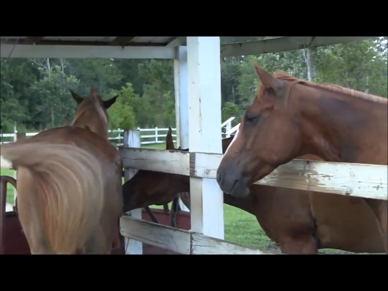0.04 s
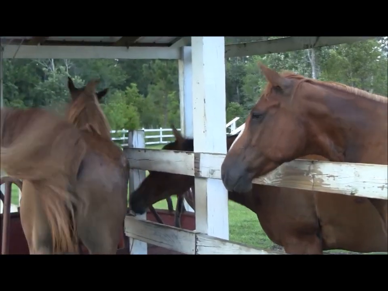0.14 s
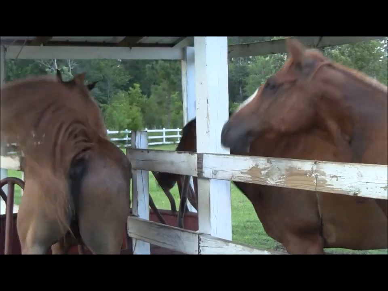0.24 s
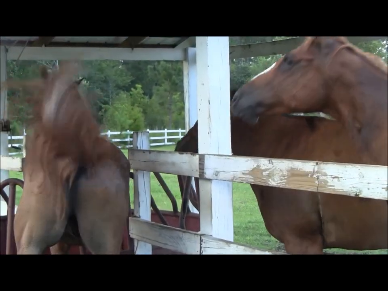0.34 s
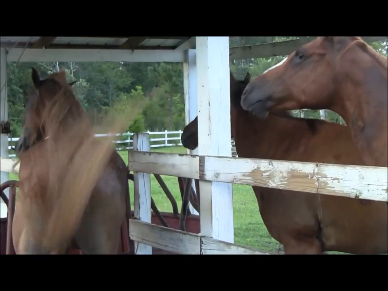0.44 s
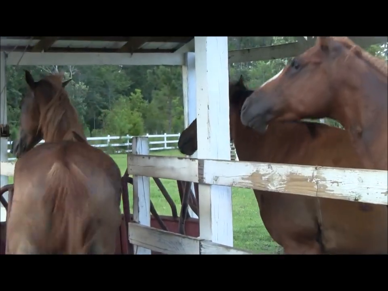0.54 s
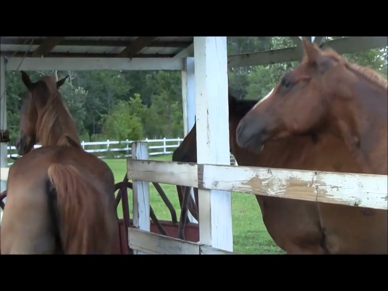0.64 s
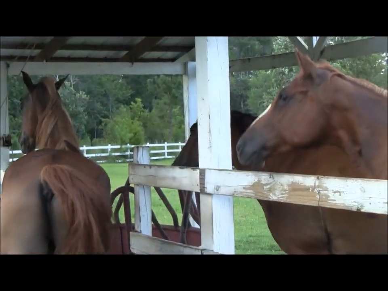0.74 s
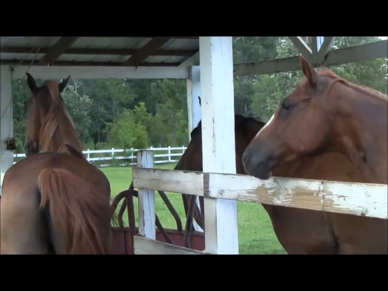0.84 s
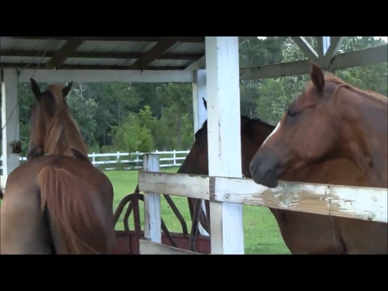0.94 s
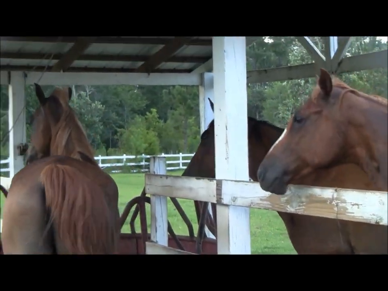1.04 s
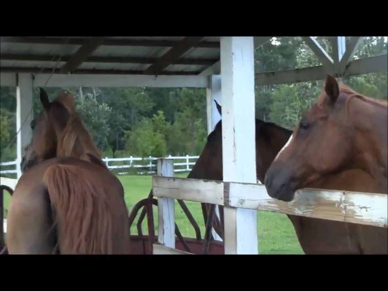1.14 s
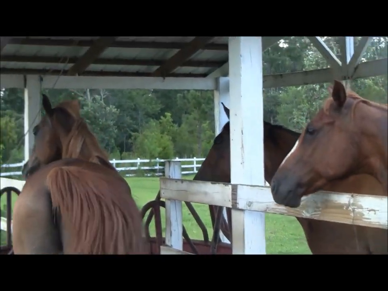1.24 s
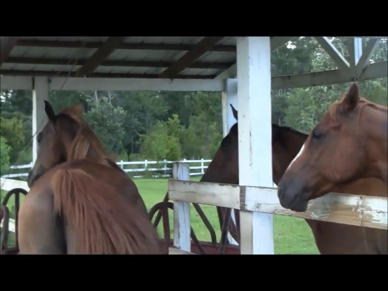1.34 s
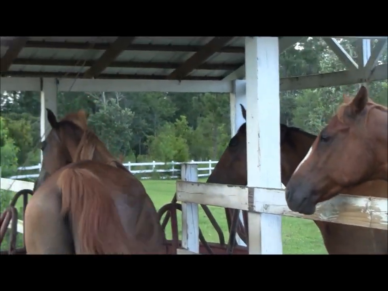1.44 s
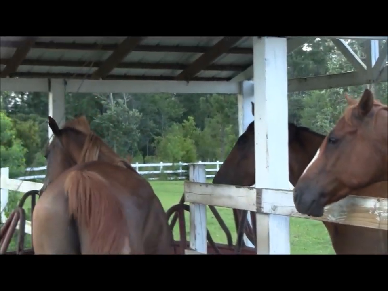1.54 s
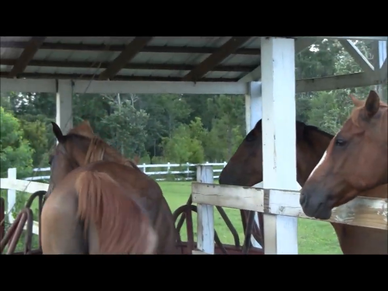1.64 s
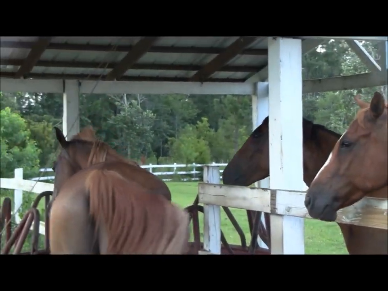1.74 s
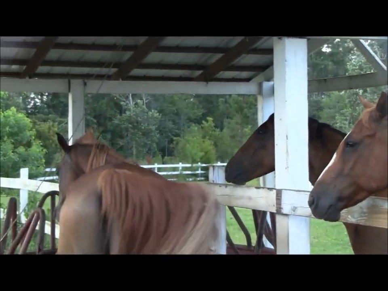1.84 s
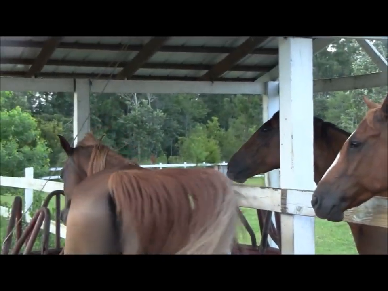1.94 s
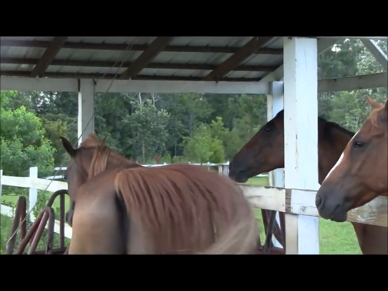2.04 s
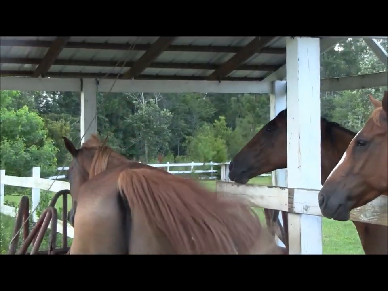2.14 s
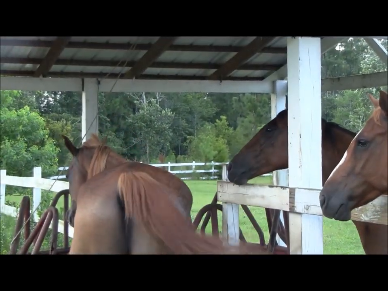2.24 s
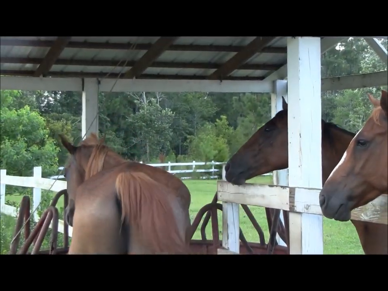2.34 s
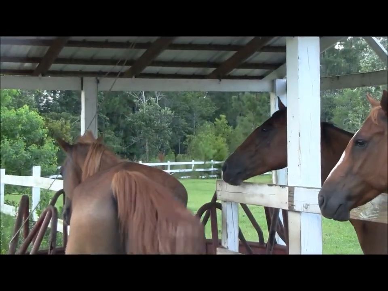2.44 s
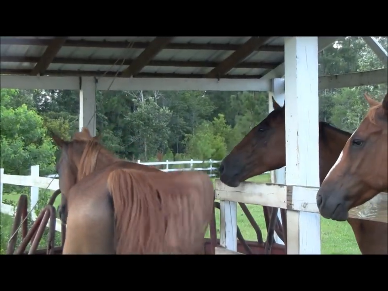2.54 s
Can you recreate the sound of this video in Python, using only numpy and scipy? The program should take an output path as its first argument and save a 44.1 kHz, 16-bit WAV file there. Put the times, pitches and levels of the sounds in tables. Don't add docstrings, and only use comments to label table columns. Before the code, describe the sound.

One brief horse squeal breaks from a snort near the start, roughens into a growl and fades in whimpers; afterwards crickets and katydids, faint traffic, soft tail swishes and a rail tick, heard outdoors with automatic gain.

```python
import sys
import numpy as np
from scipy import signal
from scipy.io import wavfile
from scipy.ndimage import uniform_filter1d

SR = 44100
rng = np.random.default_rng(int(sys.argv[2]) if len(sys.argv) > 2 else 0)


def persist_wave(psi):
    counts = np.round(np.clip(psi, -1, 1) * 32767).astype(np.int16)
    wavfile.write(sys.argv[1], SR, np.atleast_2d(counts).T)


def how_loud(loudness_db):
    steps = np.asarray(loudness_db, float) / 20
    return 10 ** steps


N = 114660
T = np.arange(N) / SR
JITTER = 0.0044

# pitch_hz, width_hz, level_db
THROAT_SHAPE = [(366, 23, -16.5), (440, 35, -14.5), (547, 146, -5), (745, 102, -8.5), (1000, 244, 0.5),
                (1571, 156, -2), (1778, 98, -5.5), (1992, 17, -11.5), (2468, 100, -17.5), (3550, 430, -24),
                (2720, 120, -36.5), (4236, 180, -26.5), (6100, 500, -38)]


def evened(x):
    return x / np.sqrt(np.mean(x ** 2) + 1e-20)


def read(points, hz):
    f, value = np.transpose(points)
    return np.interp(np.log(hz + 1), np.log(f + 1), value)


def columns(rows):
    s, *values = np.transpose(rows)
    gate = np.clip(np.minimum(T - s[0], s[-1] - T) / 0.0015, 0, 1)
    return [gate] + [np.interp(T, s, value) for value in values]


def wobble(size):
    smooth = uniform_filter1d(rng.standard_normal(N), size=size)
    return evened(uniform_filter1d(smooth, size=size // 2))


def turning(hz):
    return 2 * np.pi * np.cumsum(hz) / SR


def resonate(x, hz, width):
    turn = np.exp(1j * turning(hz * np.ones(N)))
    r = np.exp(-np.pi * width / SR)
    return 2 * (turn * signal.lfilter([1 - r], [1, -r], x / turn)).real


def humming_noise(hz, width):
    return evened(resonate(rng.standard_normal(N), hz, width))


def hiss(spectrum):
    a, b, patches = rng.standard_normal((N // 256 + 5, 513, 3)).T
    patches = uniform_filter1d(patches, size=10, axis=0)
    patches = evened(uniform_filter1d(patches, size=12, axis=1))
    colour_db = read(spectrum, np.fft.rfftfreq(1024, 1 / SR))[:, None]
    z = (a + 1j * b) * how_loud(colour_db + 1.5 * patches)
    return evened(signal.istft(z, nperseg=1024, noverlap=768)[1][:N])


def traffic():
    # pitch_hz, level_db
    rumble = [
        [(12, -71.5), (20, -36), (32, -53.5), (52, -88), (135, 4.5), (202, -0.5), (381, -9.5), (1210, 0), (2000, -10.5), (2600, -53), (4400, -120)],
        [(12, -66), (20, -33), (65, -42), (206, -10.5), (374, -5), (2000, -18), (2600, -52), (4400, -120)],
    ]
    # pitch_hz, width_hz, level_db
    drones = [(122, 7.3, -90), (128, 3.8, -62), (210.4, 9.3, -62)]
    road = np.array([how_loud(db) * hiss(spectrum) for spectrum, db in zip(rumble, (-48.5, -54))])
    for hz, width, db in drones:
        road[0] += how_loud(db) * humming_noise(hz, width)
    return road * how_loud(0.5 * (T - 2.5))


def distant_insects():
    # pitch_hz, level_db
    swarm = [(1500, -14.5), (2100, 0), (3500, -10), (6400, -17), (7100, -0.5), (10500, -12), (11300, -18),
             (15500, -26.5)]
    return np.array([how_loud(db) * hiss(swarm) for db in (-58, -62.5)])


def near_crickets():
    # start_s, strokes so far, shift of even strokes (share of a stroke; plus is later)
    strokes = [(0.03, 1.34, -0.22), (0.189, 9.78, -0.14), (0.348, 17.95, -0.07), (0.506, 26.25, -0.02),
               (0.665, 34.45, 0.11), (0.824, 42.91, 0.1), (0.982, 51.11, -0.18), (1.141, 59.37, -0.15),
               (1.3, 67.57, -0.02), (1.459, 75.41, -0.09), (1.618, 83.61, 0.02), (1.776, 91.78, 0.1),
               (1.935, 99.88, 0.04), (2.094, 107.77, 0.07), (2.252, 115.92, 0.14), (2.411, 123.96, 0.08),
               (2.57, 132.27, 0.09)]
    pitch_hz, fall_hz, stroke_s = 8213, 850, .011
    s, count, shift = np.transpose(strokes)
    k = np.arange(int(count[-1]) + 2)
    at = np.interp(k, count, s, left=-1)
    at = at + (-1.) ** k * np.interp(at, s, shift) / 59.0 - stroke_s / 2
    u = np.arange(0, stroke_s, 1 / SR)
    swell = np.sin(np.pi * (u / stroke_s) ** 0.79) ** 2
    out = np.zeros(N + 2000)
    for start, (a, b, c) in zip(at, rng.standard_normal((len(k), 3))):
        if start > 0:
            phase = turning(pitch_hz + 60 * a - fall_hz * u / stroke_s) + 3 * c
            out[round(start * SR):][:len(u)] += how_loud(0.5 * b) * swell * np.sin(phase)
    near = how_loud(-60) * evened(out[:N] * (1 + 0.1 * wobble(size=30)))
    return np.array([near, how_loud(-15.5) * np.roll(near, 2)])


def katydids():
    # pitch_hz, width_hz, centre_db, side_db
    buzz = [(9140, 210, -69, -68), (9670, 150, -66.5, -60), (10050, 200, -69.5, -86)]
    throb = 1 + 0.17 * np.sin(turning(88 + 1.2 * wobble(size=4000)))
    out = np.zeros((2, N))
    for hz, width, *levels in buzz:
        for ch, db in enumerate(levels):
            narrow = resonate(resonate(rng.standard_normal(N), hz, width), hz, width)
            out[ch] += how_loud(db) * throb * evened(narrow)
    return out


def far_cricket():
    throb = 1 + 0.49 * np.sin(2 * np.pi * 26.5 * T)
    return how_loud(-76.5) * throb * humming_noise(4619, 119)


def pasture():
    out = traffic() + distant_insects() + near_crickets() + katydids()
    out[0] += far_cricket()
    return out


def gain_control():
    # start_s, level_db
    gain = [
        (0, 4.5),
        (.195, 8),
        (.205, -1.5),
        (.4, -9),
        (.58, -4.5),
        (.78, -1),
        (1.4, 0.5),
        (2.6, 1.5),
    ]
    return how_loud(columns(gain)[1])


def tails():
    # centre_s, width_s, level_db, tilt (db per octave; plus is brighter)
    swishes = [
        (0.587, 0.036, -52, 5.5),
        (0.678, 0.036, -51, 3.5),
        (1.397, 0.023, -50.5, -3.5),
        (1.52, .025, -54, 5.5),
        (1.925, 0.019, -55, 3),
        (1.985, 0.044, -61, 1.5),
        (2.5, 0.015, -58, 9),
    ]
    # pitch_hz, level_db
    hair = [(150, -65), (500, -6), (2000, 0), (10000, -10), (16000, -8.5)]
    out = np.zeros((2, N))
    for s, width, db, tilt_db in swishes:
        colour = [(f, d + tilt_db * np.log2(f / 8000)) for f, d in hair]
        swell = np.exp(-.5 * ((T - s) / width) ** 2)
        grain = how_loud(db + 1.9 * wobble(size=150))
        out += grain * swell * np.array([hiss(colour), .6 * hiss(colour)])
    return out


def rail_ticks():
    # start_s, peak_db, pitch_hz
    ticks = [
        (.682, -49, 7230),
        (1.911, -36.5, 2440),
        (1.912, -47.5, 4300),
    ]
    out = np.zeros(N)
    for s, db, hz in ticks:
        burst = (T > s) * np.exp(-abs(T - s) / 0.0029) * rng.standard_normal(N)
        out += how_loud(db) * (.08 * burst + 3.0 * resonate(burst, hz, 700))
    return out


def snort():
    # pitch_hz, db_per_hz
    nostrils = [(35, -52.5), (60, -23.5), (1420, -10), (2840, -12), (5450, -29), (7900, -32),
                (15500, -39.5)]
    # start_s, level_db
    blow = [(.1, -61), (.124, -45.5), (.132, -32.5), (.15, -30.5), (.198, -38.5), (.204, -41), (.3, -41),
            (.48, -44), (.58, -68)]
    gate, db = columns(blow)
    return gate * how_loud(db + 0.37 * wobble(size=200)) * hiss(nostrils)


def tone(rows, upper_db=()):
    gate, hz, *levels = columns(rows)
    phase = turning(hz * (1 + JITTER * wobble(size=150)))
    levels += [levels[-1] + db + 0.86 * wobble(size=600) for db in upper_db]
    stack = sum(how_loud(db) * np.sin((k + 1) * phase + k) for k, db in enumerate(levels))
    return np.sqrt(2) * gate * stack


def yelp_and_whistle():
    # start_s, pitch_hz, level_db of 1st, 2nd, 3rd, .. partial
    yelp = [(.158, 691, -35, -41, -70), (.18, 649.4, -29.5, -28.5, -42.5), (.197, 644, -25, -15, -29),
            (.202, 657, -46, -32.5, -31.5), (.212, 651, -19, -30, -50)]
    whistle = [(0.208, 668.4, -42.5, -35, -36, -70.5), (0.222, 674.4, -11.5, -31, -37.5, -59.5),
               (0.244, 666, -18.5, -33.5, -25, -66), (0.272, 619.4, -17, -26, -45.5, -48),
               (0.286, 625, -16.5, -27, -28, -42), (0.298, 621, -14.5, -28, -41, -43),
               (0.306, 608.7, -18, -29, -43, -39), (0.322, 602, -13, -31.5, -24, -38),
               (0.338, 600, -24.5, -36, -31, -42)]
    yelp_upper = [-5, -24, -14.5, -22.5, -45]
    whistle_upper = [-5, -26, -15.5, -17, -41, -28.5]
    return tone(yelp, yelp_upper) + tone(whistle, whistle_upper)


def undertone():
    # start_s, pitch_hz, level_db
    vibration = [(.215, 342.6, -33.5), (.238, 352.3, -21.5), (.265, 330.3, -26.5), (.29, 307, -35.5)]
    # multiple of the pitch, level_db
    multiples = [(3, 0), (4, -3.5), (5, -3.5), (6, -20), (7, -27.5)]
    gate, hz, level_db = columns(vibration)
    phase = turning(hz * (1 + JITTER * wobble(size=150)))
    out = np.zeros(N)
    for m, db in multiples:
        out += how_loud(level_db + db + 3 * wobble(size=300)) * np.sin(m * phase + 1.1 * wobble(size=500))
    return gate * out


def whimpers():
    # start_s, pitch_hz, level_db of 1st and 2nd partial
    calls = [
        [(.59, 565, -46, -60), (.608, 568, -35, -29.5), (.63, 541.5, -51, -32.5), (.648, 543, -40.5, -50)],
        [(.722, 562.5, -56, -46), (.736, 558, -38, -39), (.757, 520, -62, -59)],
    ]
    return sum(tone(call) for call in calls)


def throat_rings():
    # start_s, pitch_hz, level_db
    rings = [
        [(.47, 1000, -37), (.495, 999, -33.5), (.52, 1000, -38), (.538, 993, -51), (.548, 993, -63),
         (.565, 942, -49), (.58, 925, -39), (.592, 1012, -42), (.61, 1026, -33.5)],
        [(.25, 3090, -61.5), (.265, 3090, -51.5), (.285, 2895, -55), (.305, 3000, -46)],
        [(.235, 2380, -49.5), (.26, 2290, -39), (.285, 2380, -50.5), (.3, 2370, -43)],
        [(.722, 3980, -73), (.74, 3880, -64), (.775, 3810, -70.5)],
        [(.603, 1520, -46), (.61, 1491, -29), (.635, 1443, -31), (.65, 1452, -40.5), (.672, 1460, -48)],
    ]
    return sum(tone(ring) * how_loud(2.5 * wobble(size=300)) for ring in rings)


def throat(drive, mouth, shape):
    band = signal.butter(4, [340, 6500], "band", fs=SR, output="sos")
    drive = signal.sosfilt(band, drive)
    out = np.zeros(N)
    for k, (hz, width, db) in enumerate(shape):
        ring = resonate(resonate(drive, hz * mouth, 1.02 * width), hz * mouth, 1.33 * width)
        out += (-1) ** k * how_loud(db) * np.sqrt(1000 / width) * ring
    return evened(out)


def breath(loud, weak):
    # pitch_hz, width_hz, level_db
    whimper_shape = [(370, 60, -14), (1100, 160, -2), (1510, 140, -15), (1760, 110, -6), (1965, 110, 1),
                     (2450, 35, -10), (2600, 45, -5), (3580, 320, -15), (4580, 370, -19.5)]
    effort, weak_effort = np.sqrt(abs(uniform_filter1d(np.array([loud, weak]) ** 2, size=400)))
    air = np.diff(rng.standard_normal((2, N + 1)))
    squeal_air = how_loud(-21) * effort * throat(air[0], 0.92, THROAT_SHAPE)
    whimper_air = how_loud(-12.5) * weak_effort * throat(air[1], 0.96, whimper_shape)
    return squeal_air + whimper_air


def singing_ridges(turns):
    # start_s, pitch_hz, level_db
    ridge_tables = [
        [(0.33, 577.4, -25.5), (0.34, 575.6, -38.5), (0.418, 511, -28.5), (0.438, 572.5, -37.5),
         (0.446, 556, -61), (0.462, 560, -39)],
        [(0.326, 1031, -24), (0.332, 992, -16), (0.34, 1003, -15.5), (0.374, 993, -19.5), (0.382, 959.7, -17.5),
         (0.42, 943.4, -19), (0.434, 1014, -24), (0.446, 1019, -19.5), (0.462, 1013, -32)],
        [(0.328, 1640, -33), (0.332, 1619, -33.5), (0.408, 1496, -24), (0.424, 1497, -30), (0.44, 1492, -18),
         (0.454, 1527, -25.5), (0.462, 1592, -30), (0.47, 1600, -38)],
        [(0.33, 1748, -28), (0.366, 1687, -26), (0.376, 1713, -39), (0.398, 1690, -23.5), (0.418, 1797, -32),
         (0.444, 1737, -35), (0.47, 1750, -45)],
    ]
    ridges = np.zeros(N)
    for k, rows in enumerate(ridge_tables):
        gate, hz, db = columns(rows)
        throb = 1 + .4 * np.cos(2 * np.pi * turns - 2 + 1.3 * k)
        phase = turning(hz) + .2 * wobble(size=250)
        ridges += 1.2 * gate * how_loud(db) * throb * np.sin(phase)
    strain = how_loud(-8) * ridges ** 2 + how_loud(-14) * ridges ** 3
    highpass = signal.butter(6, 1920, "high", fs=SR, output="sos")
    return ridges + signal.sosfilt(highpass, strain)


def growl():
    # start_s, mouth_hz (main resonance), level_db, pulses per s
    course = [(.326, 1011, -33, 140), (.34, 1000, -30, 118), (.37, 1000, -34, 108), (.41, 967, -30.5, 80),
              (.432, 1000, -32.5, 88), (.457, 1019, -35, 90), (.475, 1000, -37, 53), (.51, 1000, -47, 46),
              (.6, 974, -59, 170)]
    rough, folds_stop_s, fade_s = .55, .462, .012
    gate, mouth_hz, db, rate = columns(course)
    voiced = np.clip((folds_stop_s - T) / fade_s, 0, 1)
    turns = np.cumsum(rate * (1 + .05 * wobble(size=500))) / SR
    pulses = np.diff(np.floor(turns), prepend=0) * voiced * gate
    puffs = (.5 + np.exp(-(turns % 1) / 0.39)) * rng.standard_normal(N) * gate
    drive = (1 - rough) * evened(pulses) + rough * evened(puffs)
    return gate * how_loud(db) * throat(drive, mouth_hz / 1000, THROAT_SHAPE) + singing_ridges(turns)


def horse():
    loud = yelp_and_whistle() + undertone()
    weak = whimpers()
    return snort() + loud + weak + throat_rings() + breath(loud, weak) + growl()


def shelter(voice):
    t60_s, side_db = 0.87, -15.5
    t = np.arange(SR // 2) / SR
    taps = rng.choice([-1., 1.], (2, len(t))) * (rng.random((2, len(t))) < .05)
    taps = taps * how_loud(-60 * t / t60_s) * (t > .004)
    taps = taps[0] + how_loud(side_db) * np.array([taps[1], -taps[1]])
    taps = taps / np.linalg.norm(taps[0])
    return how_loud(-18) * signal.fftconvolve(voice[None], taps, axes=1)[:, :N]


def scene():
    mid, side = pasture() * gain_control() + tails()
    mid = mid + rail_ticks()
    voice = horse()
    direct = voice * how_loud(np.array([[0.54], [-0.54]]))
    return direct + shelter(voice) + np.array([mid + side, mid - side])


def band_limit(x):
    return signal.sosfilt(signal.butter(12, 15650, fs=SR, output="sos"), x)


def record(dry):
    limited = signal.oaconvolve(dry, signal.firwin(255, 15600, fs=SR)[None], "same")
    return band_limit(limited)


dry = scene()
out = record(dry)
persist_wave(out)
```